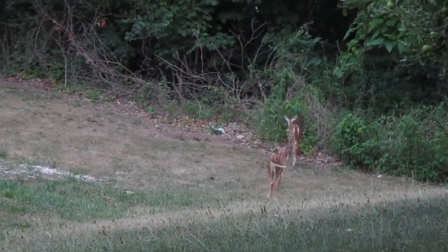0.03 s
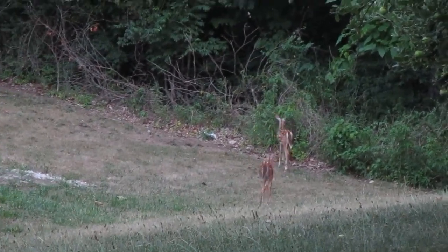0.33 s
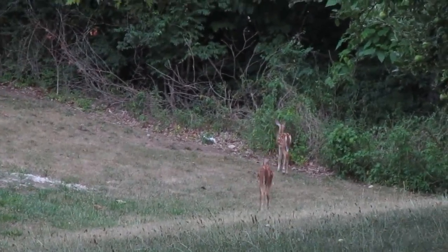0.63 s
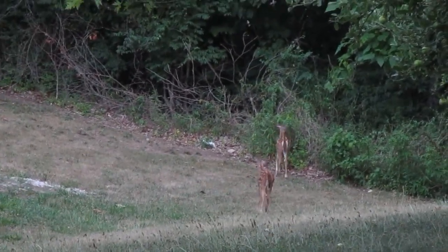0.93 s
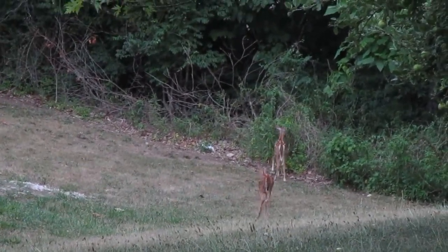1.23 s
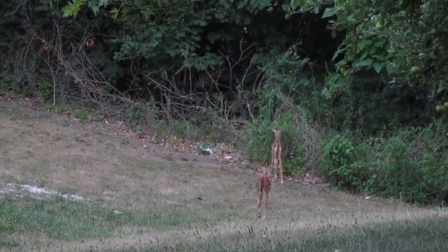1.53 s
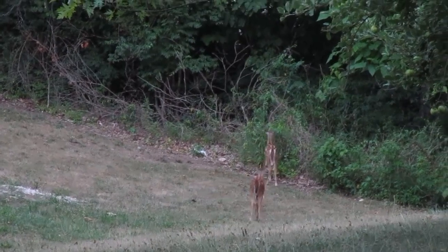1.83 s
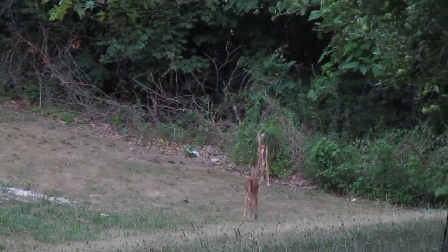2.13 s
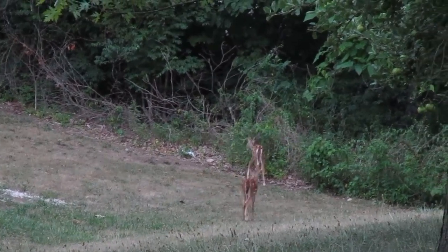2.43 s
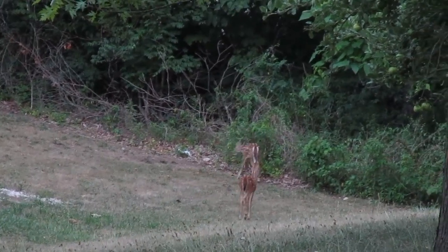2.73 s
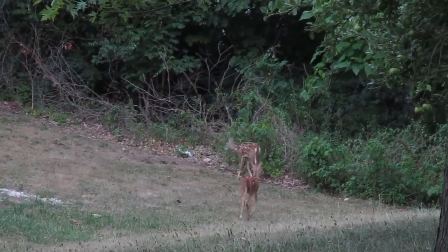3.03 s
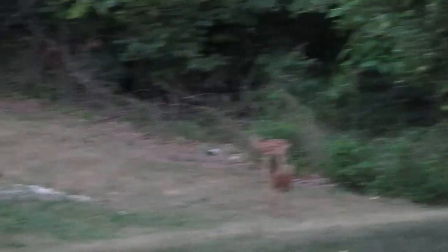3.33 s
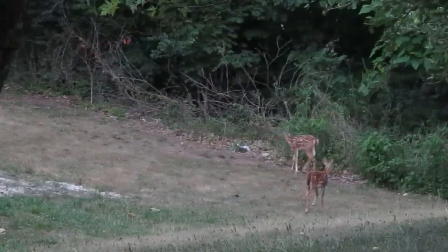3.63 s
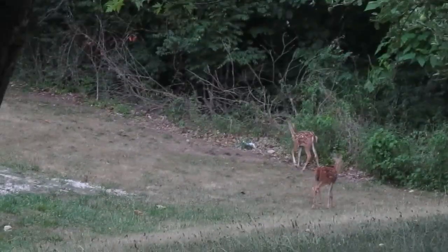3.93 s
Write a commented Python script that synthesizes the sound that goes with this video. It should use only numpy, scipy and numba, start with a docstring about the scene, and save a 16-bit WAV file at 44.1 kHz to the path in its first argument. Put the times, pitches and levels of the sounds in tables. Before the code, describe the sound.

Low gusts of wind buffet the microphone outdoors near trees, stopping about two thirds of the way through. A pulsing cicada and a farther chorus buzz throughout, with falling bird whistles, some hoarse, and a faint machine hum.

```python
"""Wind thumps on the microphone while a cicada buzzes at the edge of a wood, over a chorus of others.
The cicada clicks its timbal, a stiff patch of skin, so fast that its hollow belly rings; about every
0.7 s the song sags and recovers. A bird whistles falling notes, some hoarse, and a far machine hums.
The hardest blows of wind make the recorder's limiter turn everything down for a moment."""
import sys
import numpy as np
from scipy import signal
from scipy.fft import rfft, irfft
from scipy.io import wavfile
from scipy.ndimage import uniform_filter1d
from numba import njit

SR = 44100
rng = np.random.default_rng(int(sys.argv[2]) if len(sys.argv) > 2 else 0)


def log_audio(samples):
    """Write samples as a 16-bit WAV file to the path given in sys.argv[1]."""
    # one column per channel
    frames = np.atleast_2d(samples).T
    # limit to full scale, then quantise
    limited = np.clip(frames, -1, 1)
    pcm = np.round(limited * 32767).astype(np.int16)
    wavfile.write(sys.argv[1], SR, pcm)


N = 176400

# sags in the cicada's song: start t/s, end t/s, level/dB added to SAG_DB
SONG_SAGS = [(0.411, .495, 5), (1.112, 1.189, 4), (1.817, 1.895, 5), (2.533, 2.604, 2), (3.322, 3.359, 1.5)]
# how hard the cicada sings: t/s, level/dB added to SONG_DB
SONG_EFFORT = [(0, 3.5), (.4, 2.5), (.7, -0.5), (1.1, 2), (1.4, -0.5), (1.8, 0), (2.3, -1.5), (2.8, -0.5),
               (3.25, 3.5), (3.6, 1), (4, -1.5)]
# ring of its slack belly: f/Hz, relative level/dB
BELLY_SPECTRUM = [(2000, -44), (2720, -23), (2940, -3.5), (3150, -1.5), (3570, 0.5), (3780, -13),
                  (4000, -4.5), (4410, -7), (4830, -6.5), (5250, -13), (5700, -23), (7000, -37)]
# gusts: start t/s, end t/s, first level/dB, last level/dB
WIND_GUSTS = [(-.05, 0.079, -16, -19.5), (0.078, 0.156, -26, -22), (0.166, 0.348, -16, -16),
              (0.356, 0.586, -12.5, -15), (.58, 0.794, -29.5, -32), (0.796, 1.254, -12, -11.5),
              (1.247, 1.47, -16.5, -16.5), (1.553, 1.664, -25, -27.5), (1.77, 2.011, -12.5, -10.5),
              (2.021, 2.413, -9, -19.5), (2.485, 2.596, -15.5, -34)]
# wind rumble: f/Hz, relative level/dB
WIND_SPECTRUM = [(15, 1), (35, -13.5), (75, 5), (130, 1.5), (190, 2), (270, -7.5), (380, -20.5),
                 (550, -35.5), (900, -52), (2000, -63.5)]
# single hard blows of wind: t/s, relative level/dB, half length/s
WIND_BLOWS = [(0.024, -1.5, 0.0017), (0.066, -6, 0.0015), (0.176, -3.5, 0.0018), (0.25, 1, 0.0022),
              (0.282, -6, 0.0011), (0.379, 0.5, 0.002), (0.419, -1, 0.0018), (0.463, 1.5, 0.0015),
              (0.629, -14.5, .0013), (0.846, 9, 0.0013), (0.876, -6, 0.00083), (0.927, 1.5, 0.0011),
              (0.942, -1.5, 0.0014), (1.074, 1, 0.001), (1.203, -1.5, 0.0015), (1.261, -7, 0.0013),
              (1.34, 1, 0.0019), (1.386, -5.5, 0.0018), (1.921, -7, 0.00083), (1.932, -8, 0.0013),
              (1.949, 8.5, 0.0012), (1.96, 3, 0.0046), (1.983, -2.5, .001), (1.995, 7, .0011),
              (2.06, 1.5, 0.00097), (2.092, 0.5, .0014), (2.149, 0, 0.0015), (2.211, -1.5, 0.0015),
              (2.265, -3.5, 0.001), (2.575, -8, 0.002)]
# clear bird notes, one list each: t/s, f/Hz, level/dB
CLEAR_CALLS = [
    [(.44, 2930, -55), (.47, 3160, -47), (.515, 3270, -43), (.6, 3160, -39.5), (.71, 3040, -41.5),
     (.84, 2900, -45), (.9, 2810, -60)],
    [(3.645, 2800, -60), (3.665, 3060, -42), (3.69, 3210, -48), (3.74, 3200, -45), (3.81, 3110, -38),
     (3.93, 3045, -38.5), (4.04, 2910, -40)],
]
# hoarse bird notes, one list each: t/s, f/Hz, level/dB
HOARSE_CALLS = [
    [(1.17, 3500, -55), (1.21, 3570, -37), (1.28, 3400, -40), (1.41, 3230, -47), (1.52, 3000, -60)],
    [(2.61, 3250, -63), (2.66, 3480, -39.5), (2.715, 3500, -41), (2.79, 3260, -43.5), (2.98, 3100, -56)],
]
# the other cicadas: f/Hz, relative level/dB
CHORUS_SPECTRUM = [(2200, -26), (2800, -15), (3150, -9), (3550, -2), (3900, -2), (4250, -8.5), (4600, 0),
                   (4880, -14), (5140, 5.5), (5400, -1.5), (5700, -2), (5950, -1), (6150, -11), (6350, -4),
                   (6700, -12.5), (7100, -16.5), (8200, -16.5), (8800, -29), (10500, -25.5), (15000, -43)]
# tones of the far machine: f/Hz, average level/dB
HUM_TONES = [(102, -35.5), (171.5, -44.5), (297.3, -50), (341.3, -51)]
# outdoor air: f/Hz, relative level/dB
AIR_SPECTRUM = [(20, -5), (55, 5), (120, -0.5), (220, -3), (330, -7), (420, -18.5), (580, -11.5),
                (800, -15), (1100, -16.5), (1500, -22), (2200, -25.5), (4000, -25), (8000, -36.5),
                (11000, -44.5), (15000, -51)]
# slow swell of the air: t/s, level/dB added to AIR_DB
AIR_LEVELS = [(0, 1), (1.5, -2.5), (3, -0.5), (4, 2)]

SONG_DB, SAG_DB, SWELL_DB = -39, -4.5, 3  # base level; change in a sag; swell before it
FALL_S, RISE_S, SWELL_S = .055, .06, .085  # time into a sag, out of it, and to swell
TAUT_HZ, SLACK_HZ = 265.6, 210  # timbal cycles a second: full song, sag
TAUT_JITTER, SLACK_JITTER, RISE_JITTER = .022, .002, .041  # unevenness, as a share of that rate
BODY_TAUT_HZ, BODY_SAG_HZ, BODY_LOW_HZ = 5273, 4880, 3970  # main ring: full song, sag start, sag end
TAUT_WIDTH_HZ, SLACK_WIDTH_HZ = 340, 1130
UPPER_HZ, UPPER_WIDTH_HZ, UPPER_DB = 5970, 600, -8  # higher ring of the taut belly
GUST_EDGE_S, EDDIES_PER_S, EDDY_SPREAD_DB, EDDY_CEILING = .028, 170, .5, 2.1
SNAP_HZ, SNAP_WIDTH_HZ = 405, 200
HOARSE_ONSET_S, HOARSE_FADE_S = .15, .056
HOARSE_WOBBLE, UNDERTONE_RATIO, UNDERTONE_DB = .022, .76, -7  # at a roughness of 1
CHORUS_COUNT, CHORUS_DB, AIR_DB = 7, -38.5, -32
ECHO_S = .19  # time for the trees' echo to fade by 60 dB
LIMIT, ATTACK_S, RELEASE_DB_PER_S, TOP_HZ = .78, .0015, 18, 14950


def cicada():
    """Fast, rough clicks ring the belly; in each sag they slow and steady, and the ring drops lower."""
    t = clock()
    slack = blend = rising = drop_hz = db = 0
    for start, end, sag_db in SONG_SAGS:
        times = [start - FALL_S, start, end, end + RISE_S]
        sag = np.interp(t, times, [0, 1, 1, 0])
        slack += sag
        # fade from the taut sound to the slack one
        blend += np.interp(t, [start - FALL_S / 2, start + FALL_S / 2, end, end + RISE_S], [0, 1, 1, 0])
        rising += sag * (t > end)
        drop_hz += np.interp(t, times, [0, BODY_TAUT_HZ - BODY_SAG_HZ, BODY_TAUT_HZ - BODY_LOW_HZ, 0])
        db += (SAG_DB + sag_db) * sag
        db += np.interp(t, [times[0] - SWELL_S, times[0], start], [0, SWELL_DB, 0])
    jitter = TAUT_JITTER + (SLACK_JITTER - TAUT_JITTER) * slack ** 2 + RISE_JITTER * rising
    clicks = timbal(TAUT_HZ + (SLACK_HZ - TAUT_HZ) * slack, jitter)
    width_hz = TAUT_WIDTH_HZ + (SLACK_WIDTH_HZ - TAUT_WIDTH_HZ) * slack
    body = (1 - blend ** 2) * ring(clicks, BODY_TAUT_HZ - drop_hz, width_hz)
    upper = undb(UPPER_DB) * (1 - slack ** 2) * ring(clicks, UPPER_HZ, UPPER_WIDTH_HZ)
    belly = blend * colour(clicks, BELLY_SPECTRUM)
    effort_db = np.interp(t, *np.array(SONG_EFFORT).T)
    return level(body + upper + belly, SONG_DB) * undb(db + effort_db)


def timbal(hz, jitter, click_s=3e-5, outward_gain=.7):
    """In each cycle the timbal clicks inward, then more weakly outward."""
    cycles = np.cumsum(hz * (1 + jitter * wander(500))) / SR
    click = lambda p: np.exp(-((p % 1 - .5) / hz / click_s) ** 2)
    return click(cycles) - outward_gain * click(cycles + .5)


def wind():
    """Eddies, small swirls of air, thump the microphone at random, more sharply in strong gusts."""
    t = clock()
    eddies = (rng.random(N) < EDDIES_PER_S / SR) * rng.choice([-1, 1], N)
    rumble = colour(eddies * undb(EDDY_SPREAD_DB * rng.standard_normal(N)), WIND_SPECTRUM)
    rumble /= np.sqrt(uniform_filter1d(rumble ** 2, size=3500) + 1e-12)  # even out the loudness
    force = 0
    for start, end, first_db, last_db in WIND_GUSTS:
        fade = np.clip(np.minimum(t - start, end - t) / GUST_EDGE_S + .5, 0, 1)
        force += fade * undb(np.interp(t, [start, end], [first_db, last_db]))
    snap = level(ring(rumble, SNAP_HZ, SNAP_WIDTH_HZ), db=-.5)
    return force * EDDY_CEILING * np.tanh((rumble + force * snap) / EDDY_CEILING)


def blows():
    """Each hard eddy pushes and then pulls the thin skin inside the microphone."""
    t, thumps = clock(), 0
    for peak_s, db, half_s in WIND_BLOWS:
        offset = (t - peak_s) / half_s
        thumps -= 2 * undb(db) * offset / (1 + offset ** 2 / 2) ** 3
    return thumps


def bird_note(rows, hoarse):
    """A falling whistle; a hoarse one breaks into a wobble with a second, lower voice."""
    t = clock()
    times, hz, db = np.array(rows, float).T
    roughness = hoarse * np.clip((t - times[0] - HOARSE_ONSET_S) / HOARSE_FADE_S + .5, 0, 1)
    pitch = np.interp(t, times, hz) * (1 + (.0025 + HOARSE_WOBBLE * roughness) * wander(420))
    phase = 2 * np.pi * np.cumsum(pitch) / SR
    loudness = uniform_filter1d(np.interp(t, times, undb(db), left=0, right=0), size=200)
    undertone = roughness * undb(UNDERTONE_DB) * np.sin(UNDERTONE_RATIO * phase)
    return np.sqrt(2) * loudness * undb(wander(90)) * (np.sin(phase) + undertone)


def bird():
    """A bird whistles clear and hoarse notes."""
    clear = sum(bird_note(rows, hoarse=0) for rows in CLEAR_CALLS)
    return clear + sum(bird_note(rows, hoarse=.83) for rows in HOARSE_CALLS)


def chorus():
    """Farther cicadas click, each at its own rate, blurred by the leaves and mixed with hiss."""
    clicks = 0
    for _ in range(CHORUS_COUNT):
        hz = TAUT_HZ * rng.uniform(.8, 1.2) * (1 + .02 * wander(6))
        clicks += timbal(hz, jitter=.05)
    blur = level(trees(clicks, echo_db=1)) + rng.standard_normal(N)
    return level(colour(blur, CHORUS_SPECTRUM), CHORUS_DB)


def trees(x, echo_db):
    """The trees scatter a sound, adding a short, soft echo."""
    t = clock()[:SR // 2]
    tail = rng.standard_normal(len(t)) * np.exp(-np.log(1000) * t / ECHO_S)
    return x + undb(echo_db) * signal.fftconvolve(x, tail / np.linalg.norm(tail))[:N]


def machine(waver_db=2.6, waver_hz=2.11):
    """A far machine hums low tones that waver in loudness and pitch."""
    hum = 0
    for hz, db in HUM_TONES:
        loudness = np.sqrt(2) * undb(db + waver_db * wander(7.5))
        hum += loudness * np.sin(2 * np.pi * np.cumsum(hz + waver_hz * wander(13)) / SR)
    return hum


def air():
    """The outdoor air makes a soft rush that slowly sinks and swells."""
    rush = level(colour(rng.standard_normal(N), AIR_SPECTRUM), AIR_DB)
    return rush * undb(np.interp(clock(), *np.array(AIR_LEVELS).T))


def undb(db):
    """Turn decibels into a multiplier."""
    return 10 ** (np.asarray(db) / 20)


def level(x, db=0):
    """Scale a sound to an average (rms) level."""
    return x * undb(db) / np.sqrt(np.mean(x ** 2))


def clock():
    """The time of every sample, in seconds."""
    return np.arange(N) / SR


def wander(rate):
    """A smooth random drift, about 1 in size, that turns `rate` times a second."""
    step = max(int(SR / rate), 1)
    return level(uniform_filter1d(np.repeat(rng.standard_normal(N // step + 1), step), step)[:N])


def colour(x, points):
    """Shape a sound's lows and highs along (f/Hz, level/dB) points."""
    hz, db = np.array(points, float).T
    f = np.maximum(np.arange(N // 2 + 1) * SR / N, 1)
    return irfft(rfft(x) * undb(np.interp(np.log(f), np.log(hz), db)), N)


@njit
def band_pass(x, hz, width):
    """Keep the sound near one frequency; the centre and width can move."""
    y, band, low = np.empty(len(x)), 0., 0.
    for i in range(len(x)):
        tuning, damping = np.tan(np.pi * hz[i] / SR), width[i] / hz[i]
        swing = (band + tuning * (x[i] - low)) / (1 + tuning * (tuning + damping))
        band, low = 2 * swing - band, low + 2 * tuning * swing
        y[i] = damping * swing
    return y


def ring(x, hz, width):
    """Make a sound ring near one frequency, using two filters in a row."""
    hz, width = hz * np.ones(N), width * np.ones(N)
    return band_pass(band_pass(x, hz, width), hz, 3 * width)


def scene():
    """All the sounds meet at one microphone."""
    singers = trees(cicada() + bird(), echo_db=-14)
    return (singers + chorus() + air() + machine() + wind() + blows())[None]


def record(dry):
    """The limiter turns the sound down quickly when it gets too loud, then slowly back up."""
    release_db = RELEASE_DB_PER_S * clock()
    over_db = 20 * np.log10(np.maximum(np.abs(dry[0]) / LIMIT, 1))
    held_db = np.maximum.accumulate(over_db + release_db) - release_db
    smoothing = np.exp(-1 / (ATTACK_S * SR))
    ducked = dry * undb(-signal.lfilter([1 - smoothing], [1, -smoothing], held_db))
    rounded = ducked / (1 + ducked ** 14) ** (1 / 14)  # soften peaks that slip past
    treble_cut = signal.ellip(10, .1, 80, TOP_HZ, fs=SR, output="sos")
    return signal.sosfilt(treble_cut, rounded)


dry = scene()
out = record(dry)
log_audio(out)
```